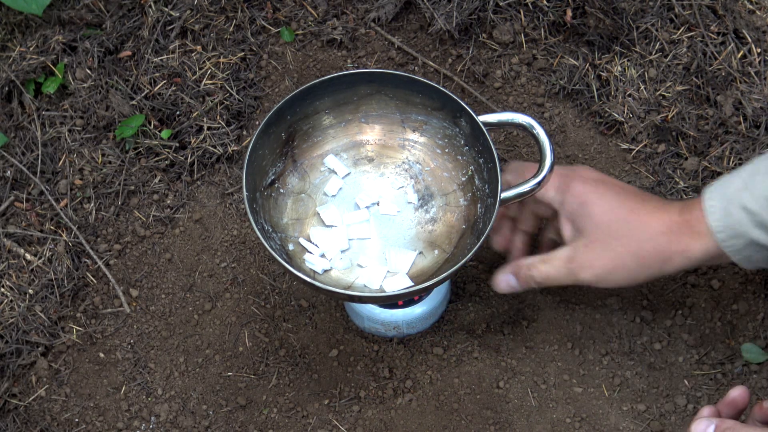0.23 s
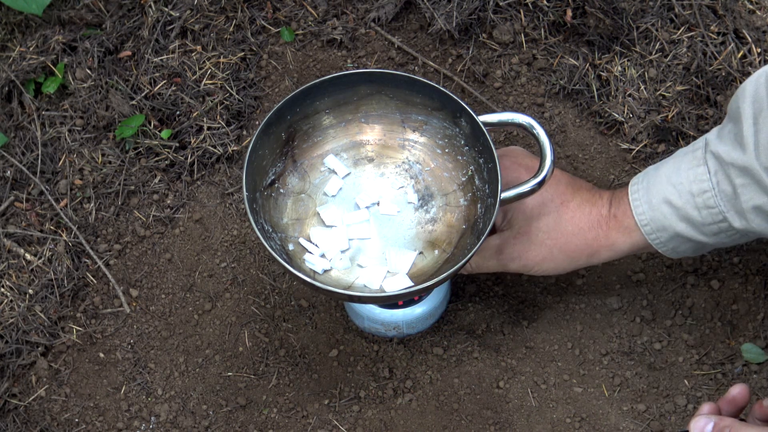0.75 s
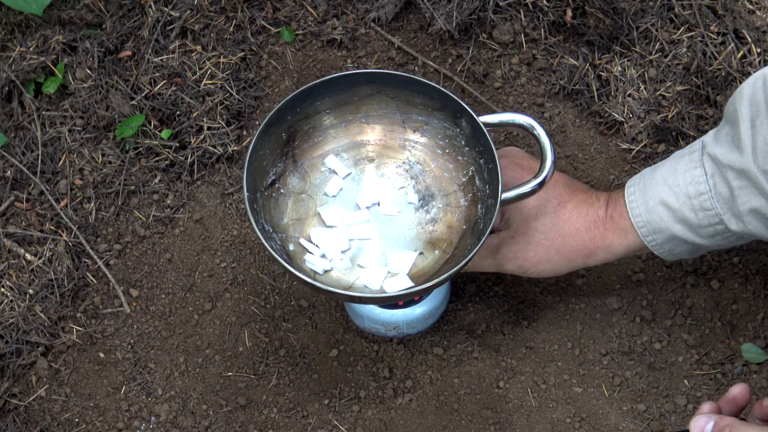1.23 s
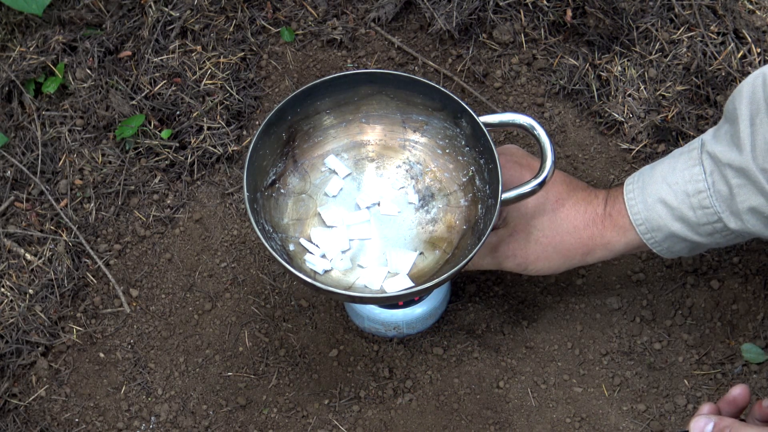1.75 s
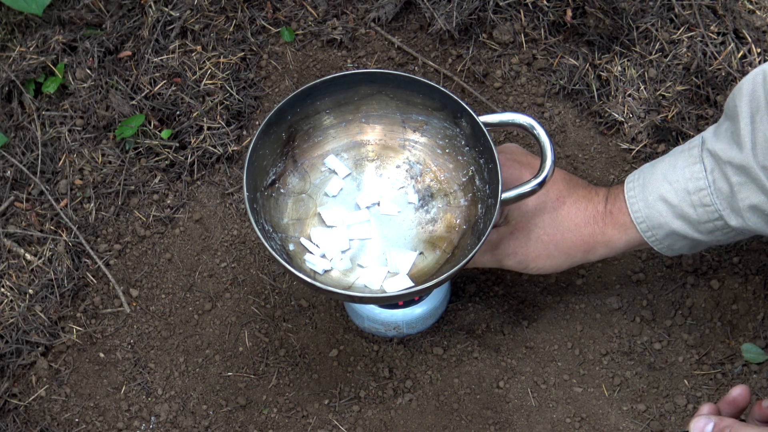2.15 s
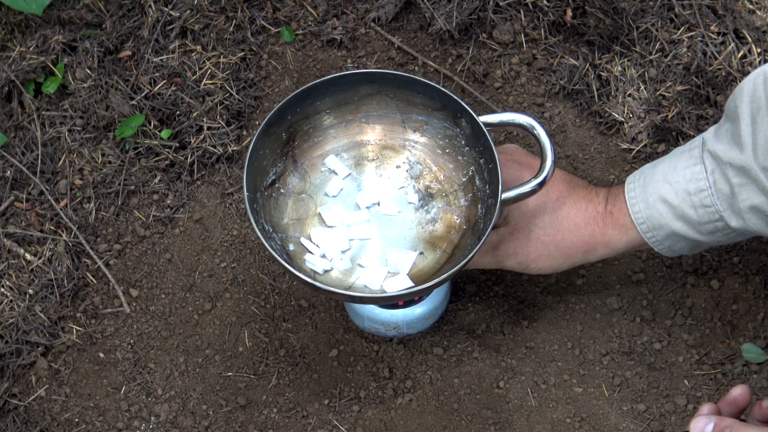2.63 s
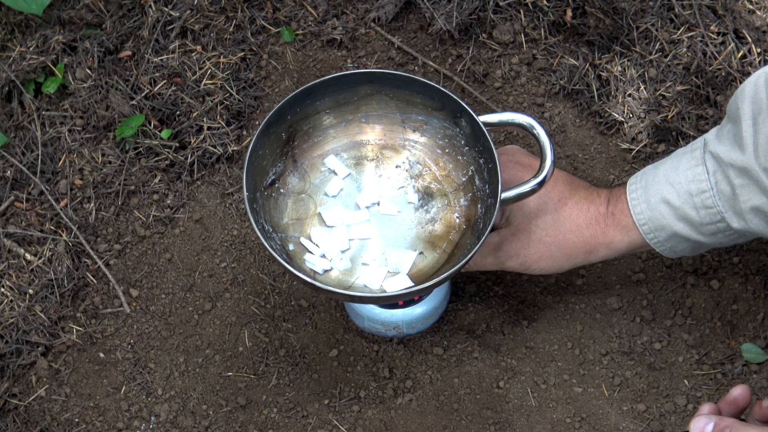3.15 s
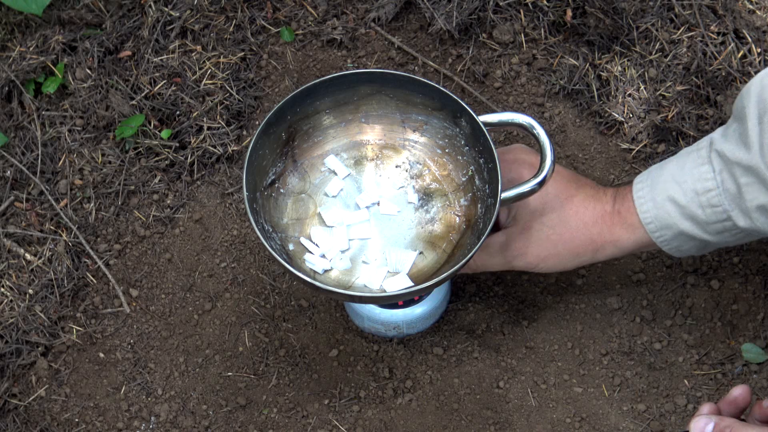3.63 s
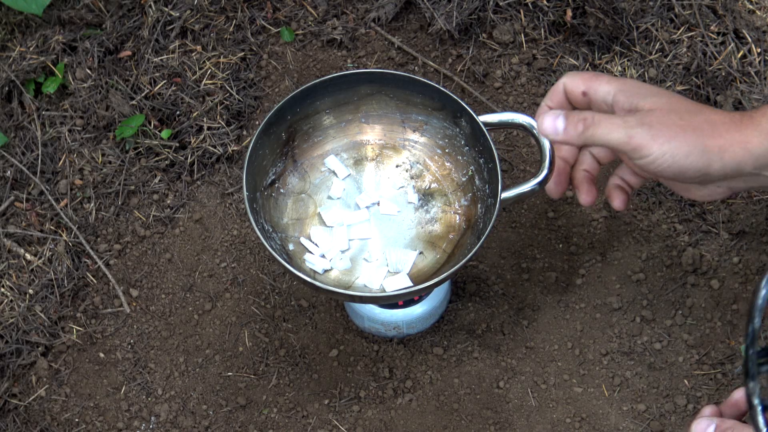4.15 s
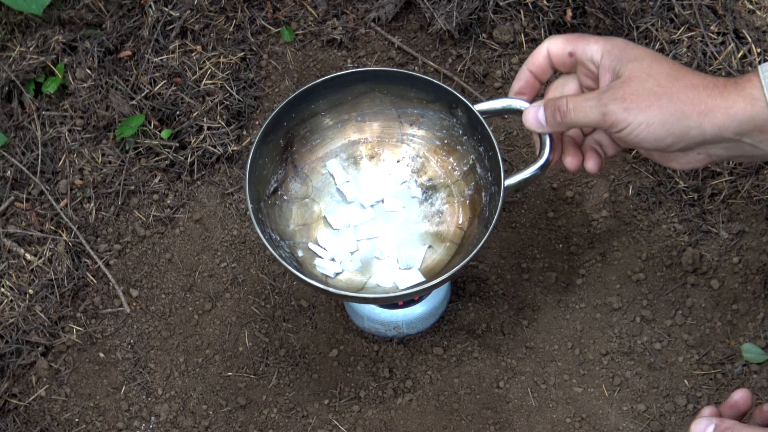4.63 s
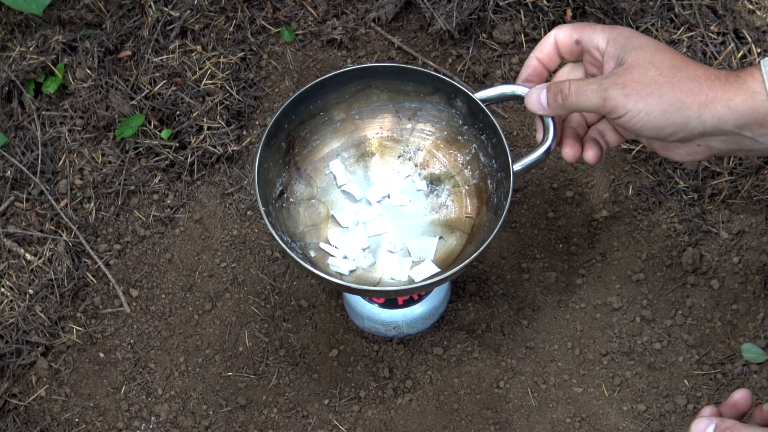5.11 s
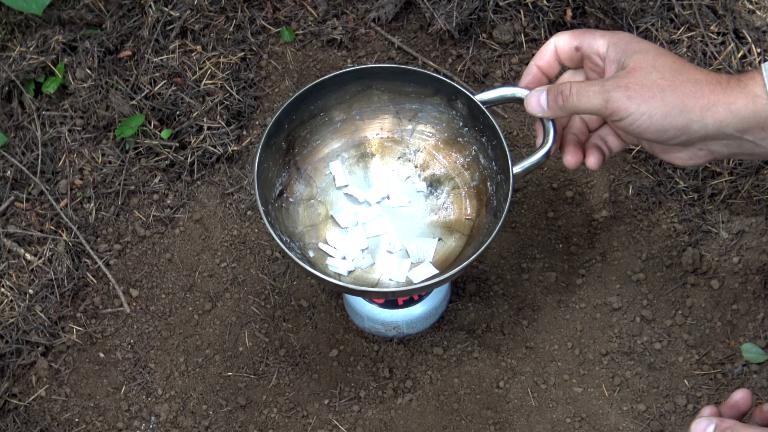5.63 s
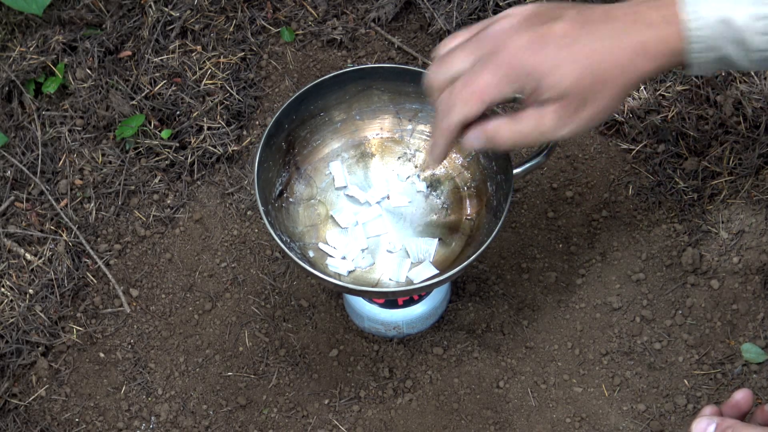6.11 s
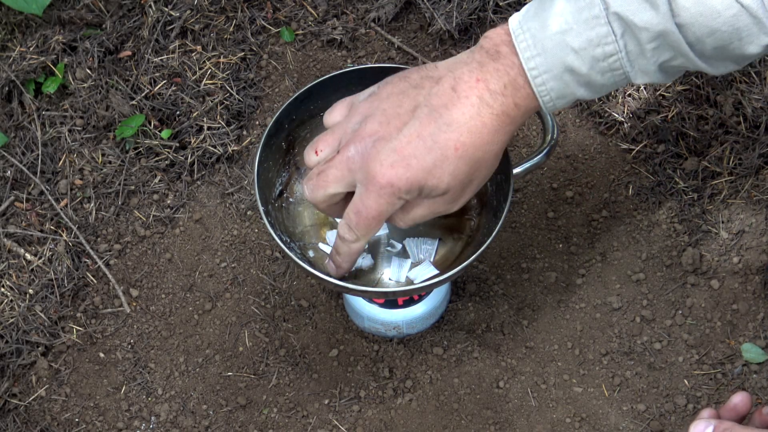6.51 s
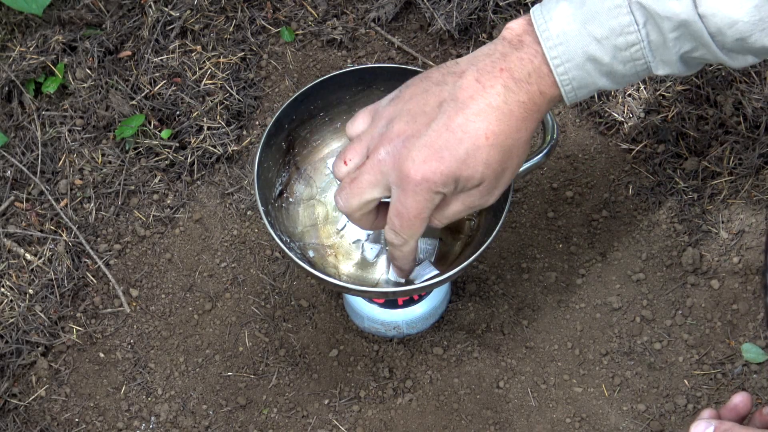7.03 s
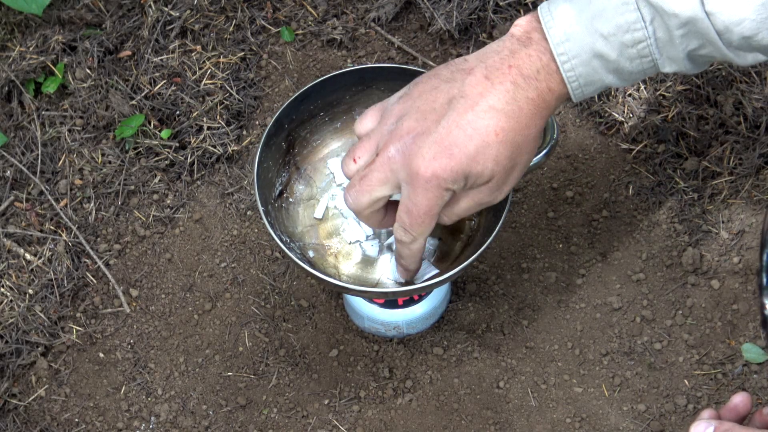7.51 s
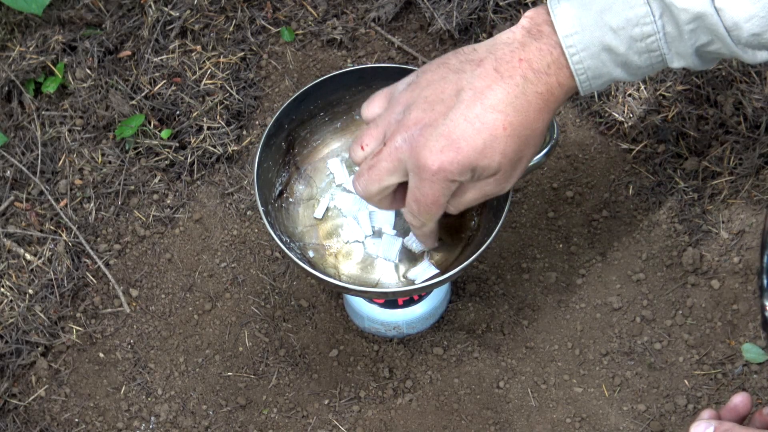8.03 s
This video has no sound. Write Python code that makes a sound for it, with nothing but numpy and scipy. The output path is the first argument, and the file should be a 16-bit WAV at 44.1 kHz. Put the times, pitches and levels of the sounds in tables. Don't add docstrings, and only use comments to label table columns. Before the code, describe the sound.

A close camera microphone hears soft, broad gas hiss with low puffs as the valve is turned. Far birdsong, quick sweeping whistles blurred by trees, comes in two phrases. Held metal gives a cluster of muted knocks and ticks, then a thin handle tick. Later a sudden hollow steel knock with rattling supports stands far above everything, dying quickly into hiss and slight scuffing.

```python
import sys
import numpy as np
from scipy import signal
from scipy.fft import rfft, irfft, next_fast_len
from scipy.io import wavfile
from scipy.ndimage import uniform_filter1d

SR = 44100
rng = np.random.default_rng(int(sys.argv[2]) if len(sys.argv) > 2 else 0)


def master(y):
    cut = np.clip(np.atleast_2d(y).T, -1, 1)
    pcm = np.round(cut * 32767)
    wavfile.write(sys.argv[1], SR, pcm.astype(np.int16))


def volts(x):
    e = np.asarray(x, float) / 20
    return 10 ** e


N = 364707


def shaped(x, points):
    hz, db = np.transpose(points)
    size = next_fast_len(len(x))
    axis = np.log(np.arange(size // 2 + 1) * SR / size + 1)
    gain = volts(np.interp(axis, np.log(hz), db))
    return irfft(rfft(x, size) * gain, size)[:len(x)]


def unit(x):
    return x / np.sqrt(np.mean(x ** 2))


def walk(rate):
    size = int(SR / rate)
    steps = np.repeat(rng.standard_normal(N // size + 1), size)
    return uniform_filter1d(uniform_filter1d(steps, size), size)[:N]


def resonance(hz, width_hz):
    return unit(signal.lfilter(*signal.iirpeak(hz, hz / width_hz, SR), rng.standard_normal(N)))


def swells(rows, attack_s, release_s):
    t = np.arange(N) / SR
    gain = 0
    for s, hold, db in rows:
        rise = np.minimum((t - s) / attack_s, 0)
        fall = np.maximum((t - s - hold) / release_s, 0)
        gain = gain + volts(db) * np.exp(rise - fall)
    return gain


HISS_DB = -55
# f/Hz, spectral density/dB per Hz
HISS_SPECTRUM = [(18, -26), (32, -10), (45, 2), (95, -11), (140, -16), (200, -6), (300, -6), (600, -5.5),
                 (1150, -7), (1400, -8.5), (2500, -11), (3400, -12), (5600, -16), (15600, -28)]
# f/Hz, side minus mid/dB
HISS_WIDTH = [(60, -26), (110, 1), (200, -8), (380, -11.5), (700, -12), (1290, -12.5), (2380, -20.5),
              (4400, -12), (8120, -4), (15000, -9)]
# f/Hz, left minus right/dB
HISS_LEAN = [(60, 0), (110, 6), (200, 0), (380, -1.5), (700, -1.5), (1290, -2), (2380, -3.5), (4400, -2),
             (8120, -0.5), (15000, 0.5)]


def hiss():
    mid = shaped(rng.standard_normal(N), HISS_SPECTRUM)
    gain = volts(HISS_DB) / np.sqrt(np.mean(mid ** 2))
    side = shaped(shaped(rng.standard_normal(N), HISS_SPECTRUM), HISS_WIDTH)
    lean = np.array(HISS_LEAN) * [1, .5]
    return gain * np.array([shaped(mid + side, lean), shaped(mid - side, lean * [1, -1])])


# f/Hz, bandwidth/Hz, level/dB re hiss
BURNER_GAP = [(426.3, 24, -15.5), (876, 36, -12.5), (990, 74, -15)]


def burner():
    return sum(volts(HISS_DB + db + 1.5 * walk(4)) * resonance(hz, width_hz) for hz, width_hz, db in BURNER_GAP)


def flutter():
    puffs = rng.standard_normal(N) * volts(0.4 * walk(25))
    return unit(shaped(puffs, [(35, -22), (70, -0.5), (120, -4.0), (220, -7), (450, -42.0)]))


# t/s, hold/s, level/dB
VALVE_SURGES = [(.7, 0.028, -72), (1.06, 0.022, -80), (1.73, 0.027, -61), (1.84, 0.074, -67),
                (2.18, .02, -75), (2.28, .04, -56), (2.42, 0.33, -59), (2.63, 0.031, -66),
                (2.88, 0.094, -70), (4.2, 0.039, -66), (6.8, 0.52, -72), (7.5, .08, -73),
                (8.12, 0.084, -69)]


def stove(rumble_db=-65):
    jet, gap, low = hiss(), burner(), flutter()
    breathing = jet * volts(.5 * walk(3))
    flow = volts(rumble_db + 2.5 * walk(9)) + swells(VALVE_SURGES, attack_s=0.015, release_s=0.021)
    return breathing + gap + low * flow


# t/s, length/s, f/Hz, level/dB
WHISTLE_NOTES = [(1.51, 0.13, 5190, -65), (1.533, 0.03, 6900, -58), (1.557, 0.08, 4570, -65),
                 (1.749, 0.11, 3320, -62), (1.799, .03, 2360, -63), (2.051, 0.051, 3340, -61),
                 (2.266, 0.038, 4920, -53.5), (2.33, 0.063, 3356, -56.5), (2.603, 0.14, 3787, -52),
                 (2.85, 0.072, 2840, -55), (3.293, 0.05, 6090, -67), (3.412, 0.023, 5400, -61),
                 (3.499, 0.084, 2900, -63), (3.544, 0.02, 5430, -58), (5.09, 0.09, 4096, -63),
                 (5.229, 0.089, 3150, -62), (5.321, 0.11, 3690, -58.5), (5.65, 0.062, 3197, -57),
                 (5.802, 0.05, 2770, -62), (5.86, 0.13, 5330, -62.5), (6.09, 0.03, 3090, -60),
                 (6.36, 0.043, 2560, -60), (6.44, 0.1, 3760, -66), (6.779, 0.02, 7060, -59.5),
                 (6.827, .04, 7120, -64)]
# t/s, length/s, f/Hz, level/dB
SLUR_NOTES = [(1.225, 0.066, 3150, -64), (1.274, 0.094, 3720, -64.5), (1.534, 0.11, 4840, -60),
              (1.737, .08, 2900, -65), (2.02, 0.17, 3016, -62.5), (2.36, 0.13, 2720, -62),
              (2.528, 0.14, 3545, -59), (2.712, 0.16, 4350, -66.5), (2.73, 0.12, 2795, -61),
              (3.128, 0.19, 3980, -66.5), (3.5, 0.15, 2950, -61), (3.784, 0.29, 3170, -64),
              (3.831, 0.19, 4280, -64), (4.199, 0.084, 3430, -60), (4.288, 0.13, 2960, -60),
              (4.619, 0.17, 4080, -68), (5.21, 0.29, 3036, -65), (5.534, 0.079, 4530, -56),
              (6.09, 0.17, 3545, -59.5), (6.365, 0.21, 3570, -67), (1.217, 0.046, 3250, -61),
              (6.38, .06, 2750, -66), (7.622, .2, 7300, -74), (7.95, 0.21, 7200, -73)]
# t/s, f/Hz, level/dB
CHIP_NOTES = [(1.54, 7110, -66), (2.155, 3640, -52), (2.54, 4900, -62), (3.34, 4500, -63),
              (3.46, 3920, -60), (3.41, 5100, -62), (3.56, 5000, -60), (3.69, 4430, -64), (3.76, 4330, -67),
              (5.29, 2810, -67), (5.46, 5560, -60), (5.76, 5030, -59), (5.76, 2465, -59), (6.27, 4820, -60),
              (4.031, 3930, -59)]
# t/s, f/Hz, level/dB
TRILL_NOTES = [(1.36, 3195, -68.5), (1.62, 4150, -68), (2.129, 2980, -68), (2.751, 4110, -65.5),
               (2.9, 5430, -68), (3.0, 6690, -74), (2.0, 2600, -70), (5.701, 2680, -66.5),
               (3.04, 3730, -65), (3.362, 5000, -66), (3.35, 6300, -67.5), (3.58, 4000, -63.5),
               (3.611, 4680, -71), (4.071, 3720, -63), (4.38, 3940, -71), (4.99, 4520, -63),
               (5.17, 6180, -70), (5.35, 3880, -63), (5.46, 4880, -58.5), (5.58, 5600, -62.5),
               (5.63, 3324, -61.5), (5.87, 5680, -63), (5.88, 4310, -57.5), (6.03, 3750, -62),
               (6.15, 4620, -61), (6.299, 3030, -65)]
# delay/s, f/Hz, level/dB
PAIR_NOTES = [
    (0, 4470, -59),
    (.025, 4050, -58),
]
PAIR_START_S, PAIR_EVERY_S = 3.865, .147
WHISTLE_HZ, SLUR_HZ, CHIP_HZ, TRILL_HZ = 190, 700, 696, 1640
CHIP_S, TRILL_S = 0.0347, .23


def song():
    pairs = [(PAIR_START_S + k * PAIR_EVERY_S + lag, CHIP_S, hz, db)
             for k in range(3) for lag, hz, db in PAIR_NOTES]
    return ([(s, length, hz, WHISTLE_HZ, db) for s, length, hz, db in WHISTLE_NOTES + pairs]
            + [(s, length, hz, SLUR_HZ, db) for s, length, hz, db in SLUR_NOTES]
            + [(s, CHIP_S, hz, CHIP_HZ, db) for s, hz, db in CHIP_NOTES]
            + [(s, TRILL_S, hz, TRILL_HZ, db) for s, hz, db in TRILL_NOTES])


def whistle(pitch):
    return np.sin(2 * np.pi * np.cumsum(pitch) / SR)


# t/s, length/s, f/Hz, fall/Hz, level/dB
GLIDE_NOTES = [
    (1.912, 0.076, 3950, 700, -56),
    (1.97, .07, 4100, 610, -63),
    (1.94, .06, 4300, 1000, -63),
    (1.72, .04, 3200, 400, -63),
    (5.54, .1, 4100, 700, -61),
    (6.35, .07, 3000, 900, -60),
    (6.25, 0.07, 4600, 830, -62),
    (1.3, .08, 3750, -400, -62),
    (5.57, .05, 4500, 1200, -59),
]


def bird(trill_hz=25.83, t60=0.72, direct_db=-9, early_s=.004):
    dry = np.zeros(N + SR)
    for s, length, hz, sweep_hz, db in song():
        t = np.arange(int(max(length, .02) * SR)) / SR
        turn = (t * trill_hz * rng.uniform(.6, 1.4) + rng.random()) % 1
        pitch = hz + sweep_hz * (.5 - turn)
        swell = np.minimum(1, np.minimum(t, t[-1] - t) / 0.0011)
        swell *= np.minimum(1, np.minimum(turn, 1 - turn) / 0.04)
        start = int((s - early_s) * SR)
        dry[start:start + len(t)] += volts(db + 6.5) * swell * whistle(pitch)
    for s, length, hz, fall_hz, db in GLIDE_NOTES:
        t = np.arange(int(length * SR)) / SR
        pitch = hz + fall_hz * (.5 - np.sqrt(t / length))
        swell = np.minimum(1, np.minimum(t, t[-1] - t) / 0.0029)
        start = int(s * SR)
        dry[start:start + len(t)] += volts(db + 6.0) * swell * whistle(pitch)
    dry[:N] *= volts(2.5 * walk(60))
    t = np.arange(SR) / SR
    echoes = rng.standard_normal((2, SR)) * np.exp(-np.log(1000) * t / t60)
    echoes /= np.sqrt(np.sum(echoes[0] ** 2))
    echoes[0, 0] = volts(direct_db)
    mid, side = signal.fftconvolve(dry[None, :N], echoes, axes=1)[:, :N]
    left = mid * volts(-0.7) + volts(-32) * side
    right = mid * volts(-0.5) - volts(-12.5) * side
    return volts(-1.0) * np.array([left, right])


def ring(modes, damping=0.53):
    t = np.arange(SR // 2) / SR
    y = 0
    for hz, db, t60 in modes:
        y = y + volts(db) * np.sin(2 * np.pi * hz * t) * np.exp(-np.log(1000) * t * damping / t60)
    return y / np.abs(y).max()


def blows(rows, crack):
    out, t = np.zeros(N + SR), np.arange(SR // 20) / SR
    for s, db, rattle in rows:
        burst = rng.standard_normal(len(t)) * np.exp(-t / rattle)
        burst *= crack / np.sqrt(np.sum(burst ** 2))
        burst[0] = 1
        start = int(s * SR)
        out[start:start + len(t)] += volts(db) * burst
    return out[:N]


def strike(rows, body, crack, air_db):
    push = blows(rows, crack)
    return signal.fftconvolve(push, body)[:N] + volts(air_db) * push


# f/Hz, spectral density/dB per Hz
PRONG_SPECTRUM = [(1470, -52), (2500, -7), (3820, -16), (5960, -9), (6590, -9.5), (7800, -5), (9170, -4),
                  (10200, -6.5), (13500, -12), (15700, -20)]


def clatter(rows, longer, tail_db, tail_s, focus_db):
    out, t = np.zeros(N + SR), np.arange(SR // 5) / SR
    for s, db, rattle, hz in rows:
        fade = np.exp(-t / (longer * rattle)) + volts(tail_db) * np.exp(-t / tail_s)
        burst = fade * rng.standard_normal(len(t))
        burst += volts(focus_db) * signal.lfilter(*signal.iirpeak(hz, 5., SR), burst)
        start = int(s * SR)
        out[start:start + len(t)] += volts(db) * burst
    return shaped(out[:N], PRONG_SPECTRUM)


# f/Hz, level/dB, t60/s
HELD_POT_MODES = [(686, 9, 0.058), (730, -4, 0.039), (870, 3, 0.05), (1073, -1, 0.046), (1410, -9, .03),
                  (1900, -3, 0.03), (2320, -20, .02)]
# t/s, pot level/dB, support level/dB, rattle/s, brightest f/Hz
SLIDE_CONTACTS = [(1.43, -64, -55, .002, 9000), (3.105, -52, -49, 0.0022, 9000),
                  (4.54, -67, -48, .002, 10000), (4.578, -55, -23, 0.0016, 8440),
                  (4.587, -43, -42, .002, 9000), (4.601, -41, -47, 0.0015, 8200),
                  (4.61, -40, -45, 0.0026, 8500), (4.63, -45, -51, 0.0023, 8500),
                  (4.662, -55, -45, 0.0011, 9500), (5.029, -47, -45, 0.00047, 9000),
                  (5.045, -38, -58, 0.0035, 9000), (5.0485, -39, -56, 0.00089, 9000),
                  (5.0532, -49, -46, 0.0028, 9000), (5.0645, -40, -43.5, 0.0024, 9000),
                  (5.078, -53, -50, 0.0018, 8000), (5.28, -59, -53, .003, 10000),
                  (5.3837, -59, -30, 0.0014, 7600), (5.391, -48, -41, 0.0012, 9300),
                  (6.71, -66, -52, .002, 11000), (6.795, -63, -50, .001, 9900),
                  (6.83, -64, -51, .001, 9000), (6.863, -57, -45, 0.001, 9500),
                  (7.497, -62, -50, .002, 10000), (7.709, -59, -52, 0.0034, 7400),
                  (7.782, -65, -49, 0.004, 7340), (7.812, -65, -54, .003, 8500),
                  (7.8995, -56, -35, 0.0018, 11100), (7.965, -61, -54, .002, 5000)]


def sliding_pot():
    hits = np.array(SLIDE_CONTACTS)[:, [0, 1, 3]]
    return strike(hits, ring(HELD_POT_MODES), crack=1.0, air_db=-25)


def sliding_ticks():
    hits = np.array(SLIDE_CONTACTS)[:, [0, 2, 3, 4]]
    return clatter(hits, longer=2.6, tail_db=-33.0, tail_s=.018, focus_db=5.0)


# f/Hz, level/dB, t60/s
SOIL_MODES = [(250, -5.5, 0.036), (360, 7.5, 0.0086), (565, 2.5, 0.012), (935, 1, 0.025)]
# t/s, level/dB, rattle/s
SOIL_THUDS = [
    (2.31, -44, .002),
    (4.579, -42, 0.00093),
    (4.59, -42, .01),
    (4.625, -40, .015),
    (5.3835, -40, 0.0012),
    (5.391, -50, .002),
    (7.5, -43, .04),
    (7.84, -53, .002),
    (8.22, -47, .002),
]


def canister():
    return strike(SOIL_THUDS, ring(SOIL_MODES), crack=0.27, air_db=-20)


def knocking(rows, rise_s):
    out, t = np.zeros(N + SR), np.arange(SR // 2) / SR
    for s, hz, db, t60 in rows:
        swell = (1 - np.exp(-t / rise_s)) * np.exp(-np.log(1000) * t / t60)
        start = int(s * SR)
        out[start:start + len(t)] += volts(db) * swell * np.sin(2 * np.pi * hz * t)
    return out[:N]


# t/s, f/Hz, level/dB, t60/s
SOFT_KNOCKS = [(4.5775, 250, -37, 0.044), (5.3835, 320, -45, .025), (5.3835, 620, -48, .02),
               (5.388, 930, -44, .04), (4.578, 400, -38, 0.017), (4.74, 940, -49.5, .06),
               (6.088, 6480, -51, .08), (6.088, 7500, -51, .06), (4.578, 1660, -46, .02),
               (4.578, 1250, -43, .02), (4.586, 730, -42, .04), (4.594, 1160, -50, .04),
               (4.6015, 693, -35, 0.04), (4.603, 950, -48, .04), (4.6105, 660, -34, 0.027),
               (4.63, 400, -49, 0.032), (4.645, 520, -48, .04), (4.797, 1860, -56, 0.045),
               (5.066, 2350, -50, 0.033), (4.634, 870, -45.5, .03), (5.0295, 660, -33.5, 0.037),
               (5.036, 1830, -51, .04), (5.044, 640, -46, .04), (5.048, 656, -33, 0.022),
               (5.052, 1870, -44, .025), (5.055, 990, -41, 0.027), (5.064, 700, -33.5, 0.038),
               (5.064, 1940, -50, .04), (5.075, 1790, -47, .03), (5.079, 700, -47, .05),
               (5.079, 1020, -47, .04), (5.091, 700, -48, .04)]


def held_knocks():
    return knocking(SOFT_KNOCKS, rise_s=0.0017)


# t/s, hold/s, level/dB
SKIN_RUBS = [
    (4.6, .02, -67),
    (4.75, .01, -65),
    (4.79, 0.033, -59.5),
    (4.87, 0.052, -71),
    (6.7, 0.04, -70),
    (6.75, .01, -71),
    (6.86, 0.045, -69),
    (7.45, .05, -70),
    (7.78, 0.047, -83),
]


def rubbing():
    slips = rng.standard_normal(N) * volts(5.4 * walk(300))
    bright = shaped(slips, [(4000, -28), (7500, 3), (9500, 4), (12500, 0), (16000, -20)])
    return unit(bright) * swells(SKIN_RUBS, attack_s=0.035, release_s=0.05)


# t/s, hold/s, level/dB
SINGING_SWELLS = [
    (4.7, .05, -70),
    (5.5, 0.35, -64),
    (6.3, 0.19, -67),
]


def singing():
    return resonance(236., 9.) * swells(SINGING_SWELLS, attack_s=0.049, release_s=0.16)


# f/Hz, level/dB, t60/s
HANDLE_MODES = [(6540, 0, 0.099), (7540, -6, 0.11), (8900, -10, 0.027), (9830, 0, 0.14), (11700, 4, 0.071),
                (13140, -9, .15)]
# t/s, level/dB, rattle/s
HANDLE_TOUCHES = [
    (5.594, -60.5, .004),
    (6.0876, -49.5, 0.011),
    (6.201, -63, .005),
]


def handle():
    rattle = strike(HANDLE_TOUCHES, ring(HANDLE_MODES, damping=2.0), crack=2.9, air_db=18.0)
    return shaped(rattle, [(3000, -2.5), (6000, 0), (12500, 0), (15500, -9)])


SETTLE_S, SETTLE_LENGTH_S, SETTLE_DB = 7.337, .0135, -26.5
SETTLE_HZ, SETTLE_CLIMB_HZ_PER_S = 345, 6500


def settling(attack_s=0.0019, release_s=.004):
    t = np.arange(N) / SR - SETTLE_S
    hz = SETTLE_HZ + SETTLE_CLIMB_HZ_PER_S * np.clip(t, 0, .03)
    swell = swells([(SETTLE_S + attack_s, SETTLE_LENGTH_S, SETTLE_DB)], attack_s / 2, release_s)
    return whistle(hz) * swell


# t/s, f/Hz, level/dB, t60/s
CLANG_MODES = [(7.3375, 560, -33, .04), (7.338, 780, -27, .04), (7.338, 895, -31, .03),
               (7.338, 1309, -30, .08), (7.338, 2035, -45, .06), (7.338, 2600, -41, .04),
               (7.338, 2900, -41, .05), (7.339, 876, -29.5, .24), (7.33955, 911, -28.5, .24),
               (7.3395, 997, -15.5, .14), (7.339, 2400, -44, .05), (7.339, 3390, -42, .06),
               (7.338, 1545, -29, .06), (7.341, 1745, -26, .09), (7.341, 3150, -45, .08),
               (7.344, 692, -26, .2), (7.3447, 724, -25.5, .18), (7.348, 2600, -38, .09),
               (7.35, 2218, -48, .5), (7.3496, 1745, -32, .03), (7.35, 1820, -44, .09),
               (7.353, 560, -29, .05), (7.356, 640, -31, .05), (7.355, 1580, -33, .04),
               (7.357, 2035, -48, .2), (7.364, 1600, -35, .035), (7.363, 482, -38.5, .3),
               (7.365, 1309, -54, .5), (7.378, 1820, -52, .2), (7.3796, 997, -38, .03),
               (7.381, 1580, -41, .05), (7.405, 1690, -53, .4)]


def clang():
    return knocking(CLANG_MODES, rise_s=.002)


# f/Hz, level/dB, t60/s
FREE_POT_MODES = [(400, -11, .05), (480, -16, 0.19), (550, -7.5, .06), (692, -16, 0.11), (729, 1, 0.11),
                  (850, -12, .09), (918, -9, 0.19), (1008, -6, 0.038), (1250, -27, .035),
                  (1560, -0.5, 0.019), (1660, -32, 0.23), (1745, -15, 0.03), (2230, -46, .3),
                  (2600, -20, 0.06)]
# f/Hz, level/dB, t60/s
RIM_MODES = [(1820, -6, .1), (2032, -15, 0.17), (2900, -2, .03), (3150, 5, .03), (3470, -1, 0.054),
             (3630, -11, 0.045)]
# t/s, pot level/dB, support level/dB, rattle/s
DROP_BOUNCES = [
    (7.3376, -10.5, -26, 0.0013),
    (7.3412, -16, -21, 0.0033),
    (7.345, -27, -22, 0.0028),
    (7.3483, -12.5, -22.5, 0.0029),
    (7.351, -22, -23, .003),
    (7.353, -26, -28, .0026),
    (7.3569, -16, -30, 0.0028),
    (7.3655, -30, -36, .003),
    (7.372, -28, -43, .003),
    (7.3815, -16, -46, .0013),
]


def dropped_pot():
    hits = np.array(DROP_BOUNCES)[:, [0, 1, 3]]
    body = ring(FREE_POT_MODES) + volts(-17) * ring(RIM_MODES)
    free = strike(hits, body, crack=2.4, air_db=-12)
    return shaped(free, [(200, -16), (290, -9), (380, 0), (16000, 0)])


def dropped_clatter(brightest_hz=8800):
    hits = [(s, db, rattle, brightest_hz) for s, _, db, rattle in DROP_BOUNCES]
    return clatter(hits, longer=1.2, tail_db=-27, tail_s=0.031, focus_db=0.5)


def stirring(start_s=7.4, level_db=-54.5, fade_s=0.28):
    grit = rng.standard_normal(N) * volts(1.6 * walk(45))
    scrape = signal.fftconvolve(grit, ring(FREE_POT_MODES, damping=1.4))[:N]
    scrape = shaped(scrape, [(300, 6), (1000, -16), (1700, 5), (3000, -21)])
    return unit(scrape) * swells([(start_s, .1, level_db)], .02, fade_s)


def pot():
    knocks = volts(-22.0) * dropped_pot() + volts(-10.5) * sliding_pot() + volts(0.5) * held_knocks()
    knocks += volts(4.5) * dropped_clatter()
    knocks += volts(-3.5) * sliding_ticks()
    knocks += handle()
    knocks += stirring()
    knocks += canister()
    radiated = shaped(knocks, [(60, -30), (150, -8), (240, 3.5), (330, 0.5), (450, 4.5), (13000, 1.0), (16000, -5)])
    return clang() + settling() + radiated


def scene():
    near = pot() + rubbing()
    angle = volts(-25.0) * (np.roll(near, 3) - near)
    lean = shaped(near, [(200, -16), (400, -14), (600, -24), (1500, -23), (16000, -30)])
    return stove() + singing() + bird() + near + np.array([angle - lean, lean - angle])


def band_limit(x):
    return signal.sosfilt(signal.butter(12, 16340, fs=SR, output="sos"), x)


def record(dry):
    top_hz = 15760
    cut = signal.sosfilt(signal.ellip(10, .2, 60, top_hz, fs=SR, output="sos"), dry)
    return band_limit(cut)


dry = scene()
out = record(dry)
master(out)
```